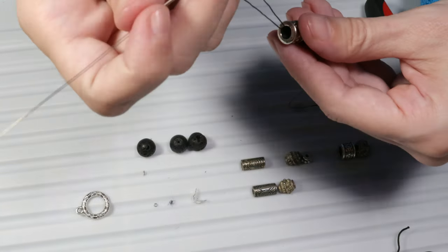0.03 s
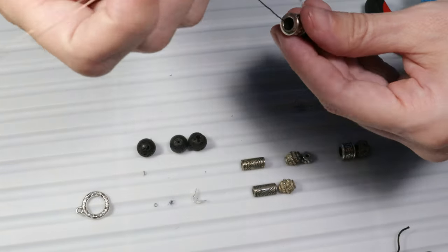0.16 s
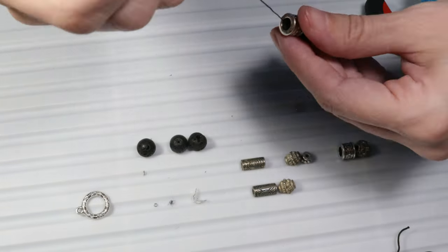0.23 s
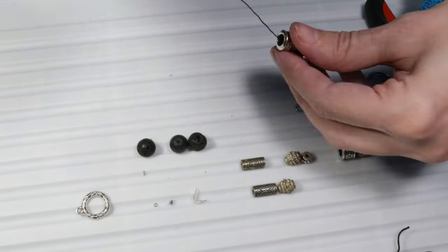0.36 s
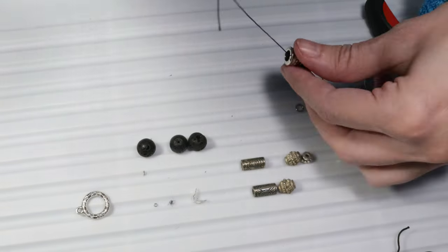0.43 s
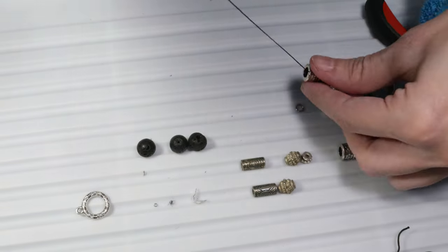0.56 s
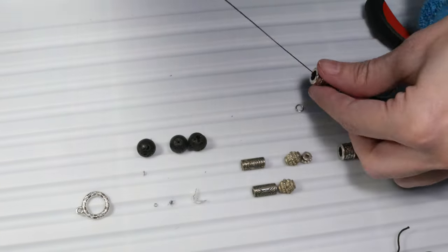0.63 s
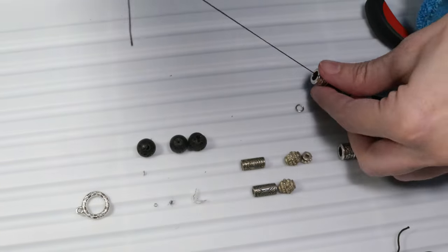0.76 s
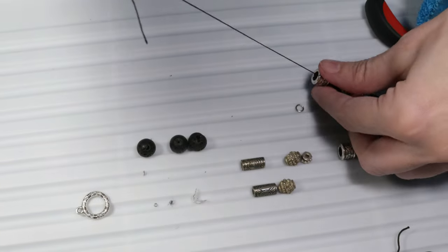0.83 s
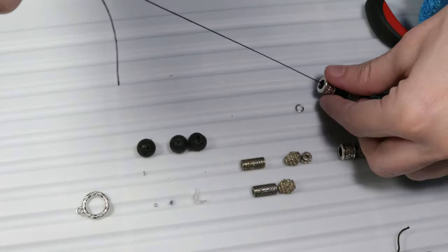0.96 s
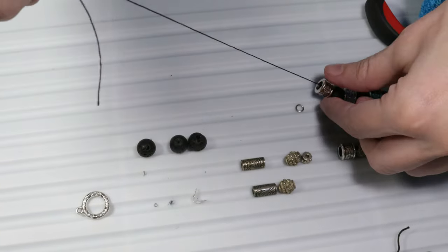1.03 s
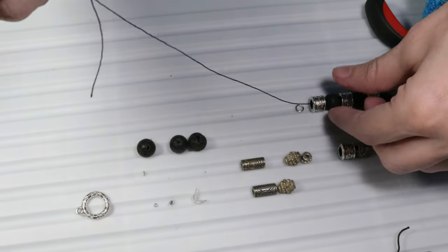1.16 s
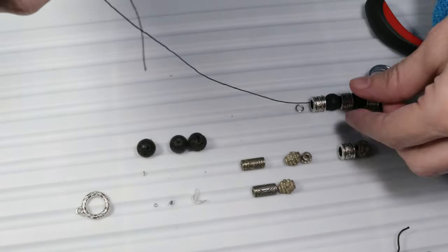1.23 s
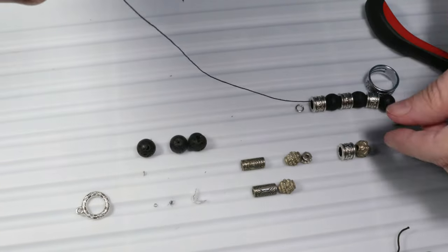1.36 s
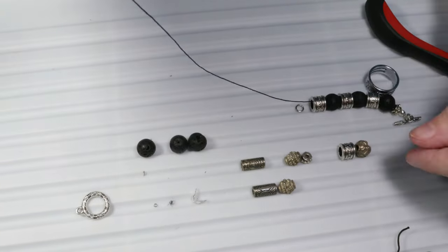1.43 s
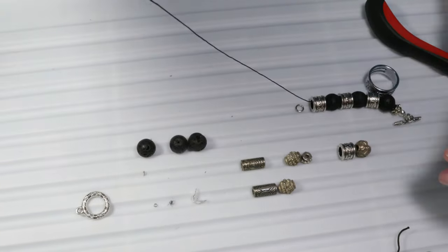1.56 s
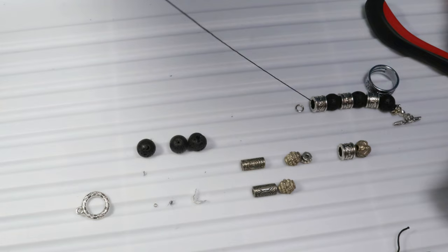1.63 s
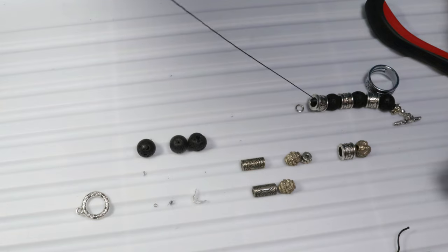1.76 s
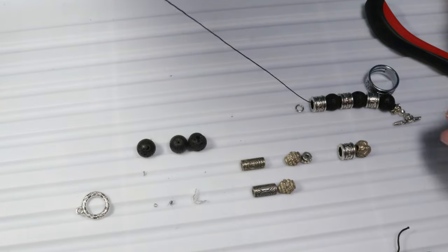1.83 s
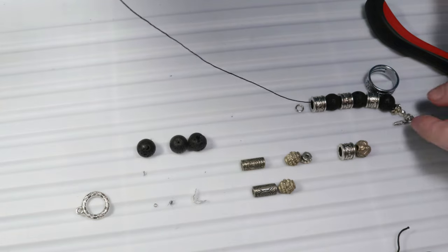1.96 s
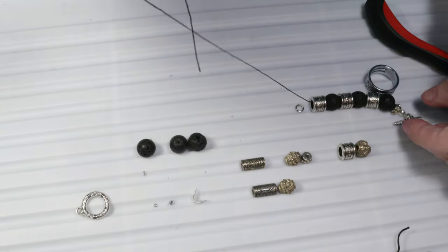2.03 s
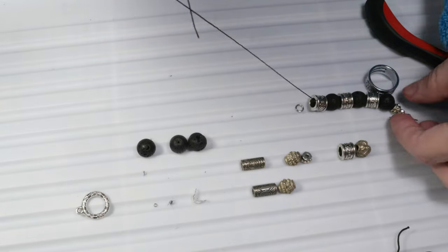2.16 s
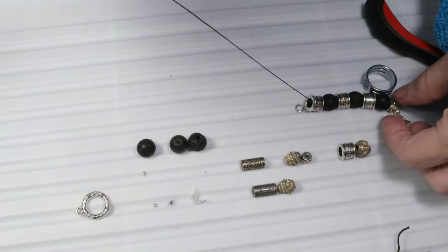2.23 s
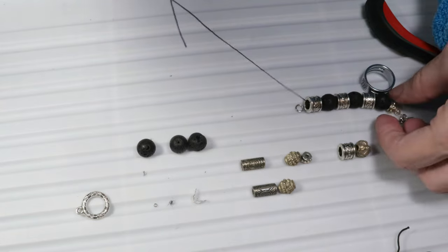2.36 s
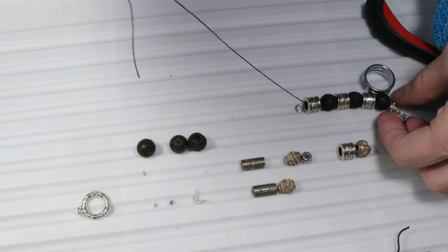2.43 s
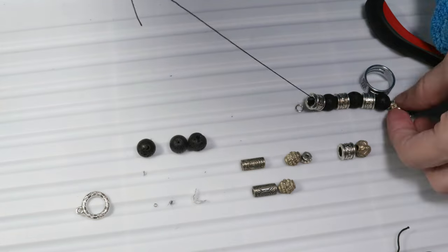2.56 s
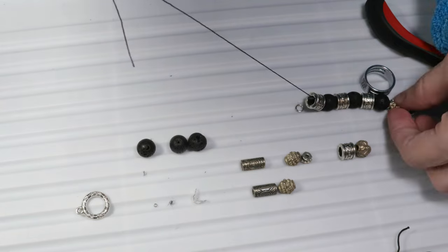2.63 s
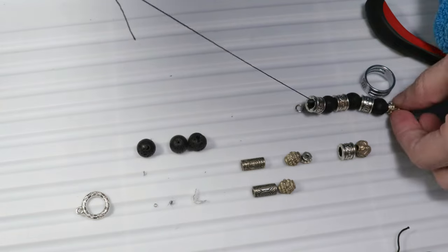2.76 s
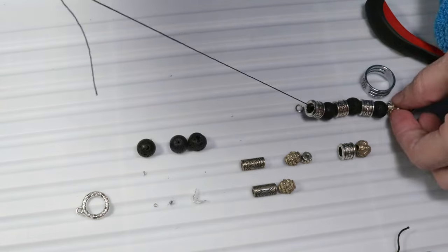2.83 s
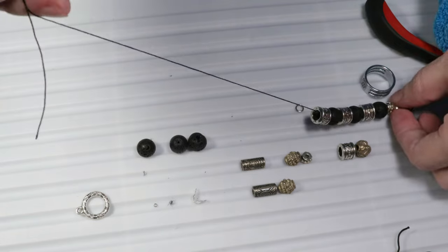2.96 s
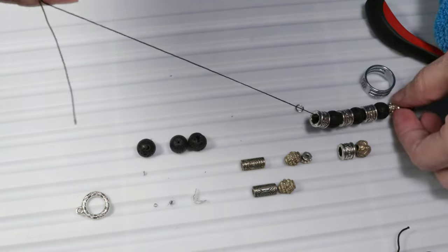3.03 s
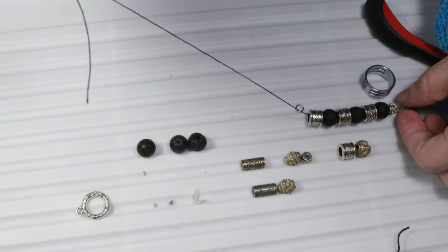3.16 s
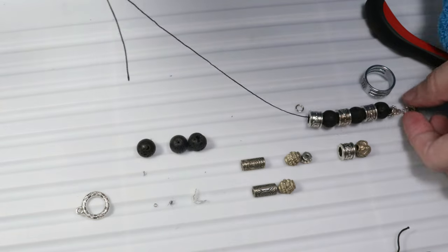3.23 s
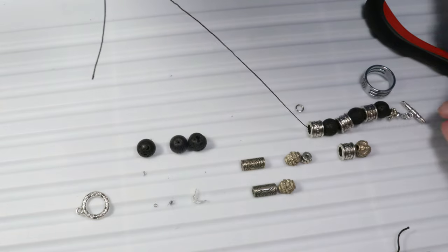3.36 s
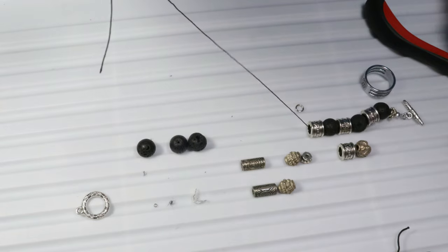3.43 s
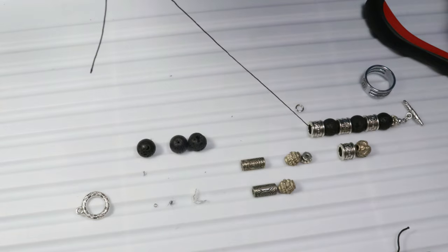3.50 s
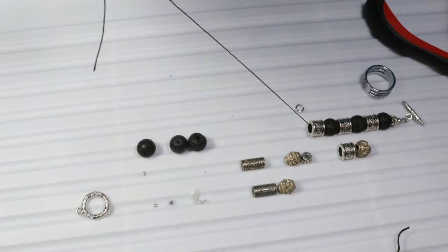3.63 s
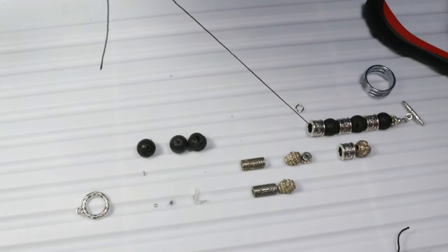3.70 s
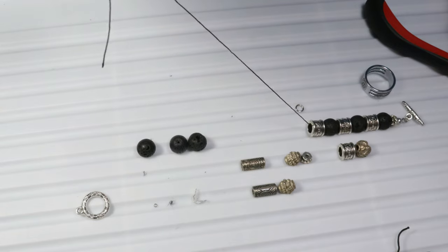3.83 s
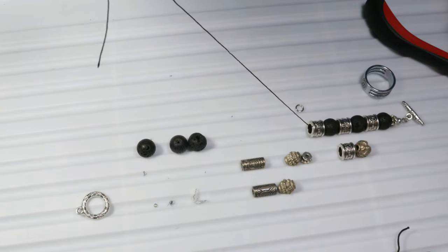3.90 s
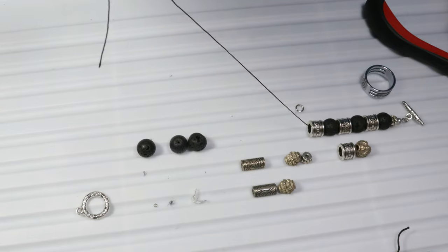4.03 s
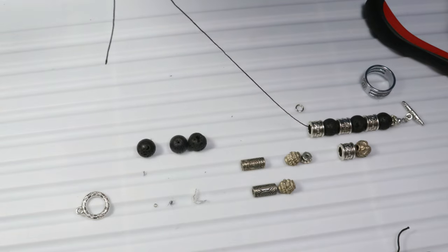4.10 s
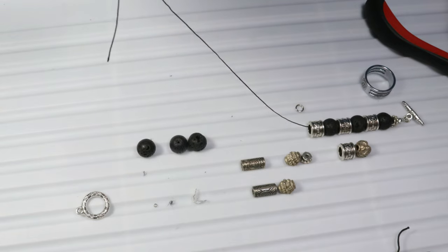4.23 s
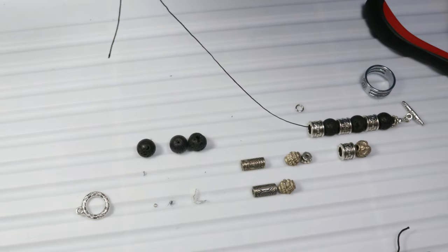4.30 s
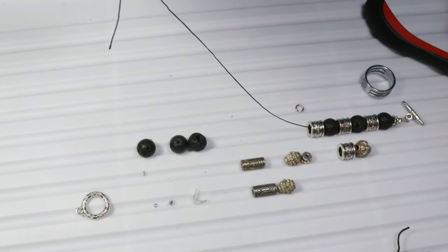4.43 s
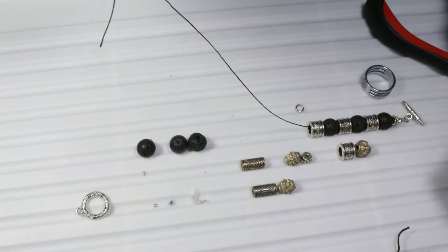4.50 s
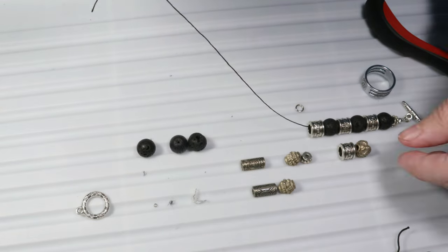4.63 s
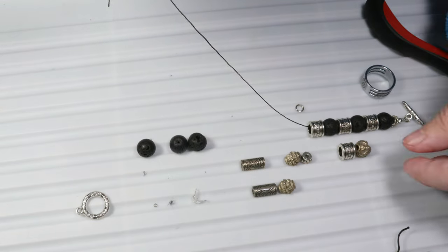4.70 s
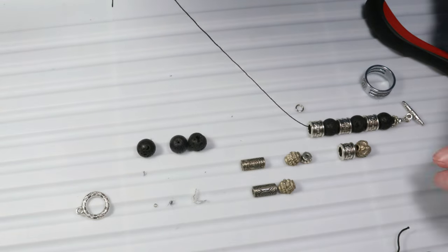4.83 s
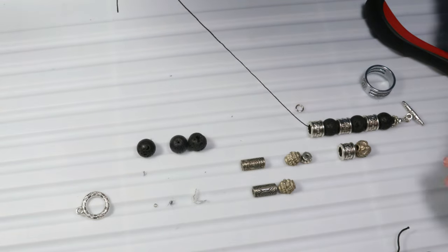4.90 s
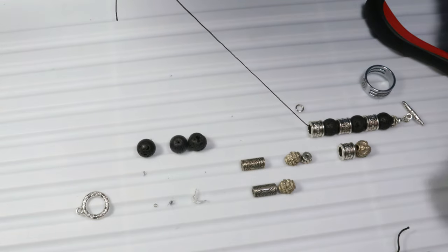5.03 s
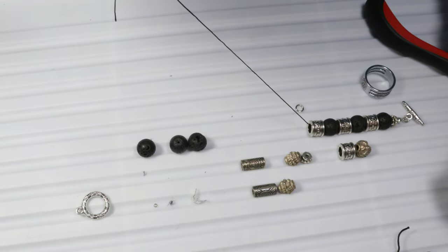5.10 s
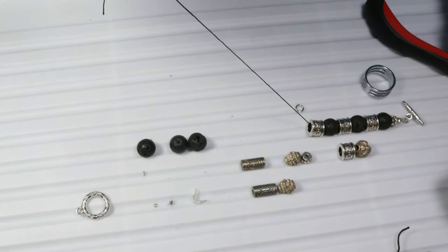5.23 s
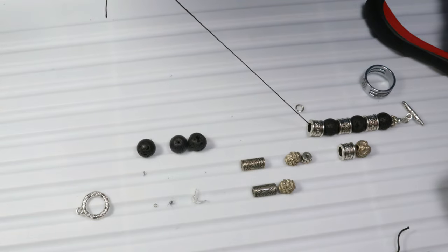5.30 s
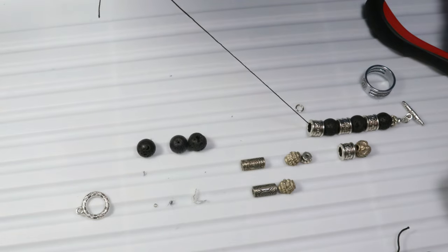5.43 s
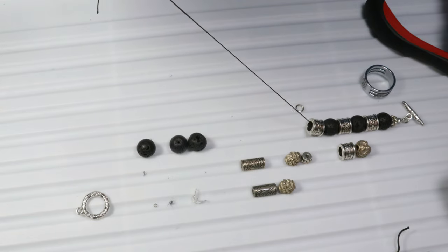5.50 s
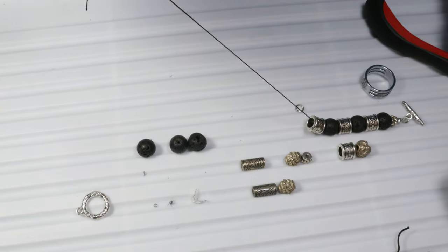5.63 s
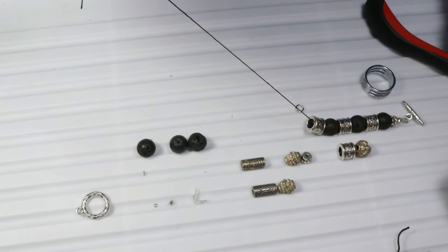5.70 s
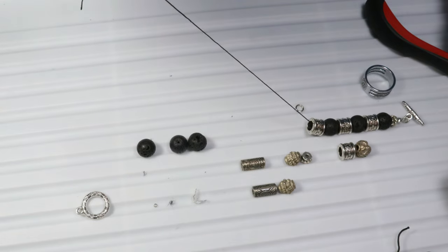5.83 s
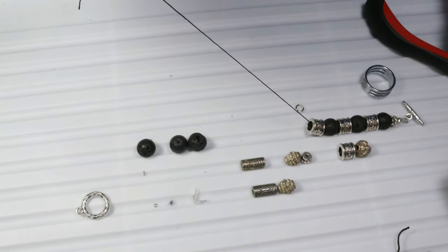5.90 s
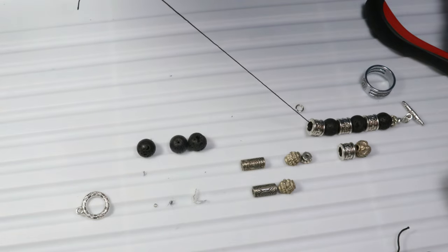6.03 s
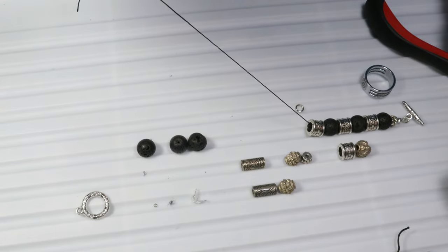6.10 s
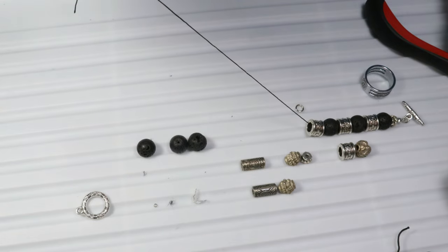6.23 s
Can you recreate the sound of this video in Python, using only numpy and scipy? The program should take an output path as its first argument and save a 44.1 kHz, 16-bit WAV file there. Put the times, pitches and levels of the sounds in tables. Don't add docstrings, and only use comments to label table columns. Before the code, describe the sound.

After a quiet start, small hard beads tick and rub against a thin, resonant table, building to a dense rattle as the strand is laid down. A few stray taps, then dull fingertip bumps, short drags and clicks. A pause of faint touches leads to another crisp clatter when the strand is let go. The ending is almost empty, with soft fan and air noise. Close and dry.

```python
import sys
import numpy as np
from scipy import signal
from scipy.fft import rfft, irfft, next_fast_len
from scipy.io import wavfile
from scipy.ndimage import uniform_filter1d

SR = 44100
rng = np.random.default_rng(int(sys.argv[2]) if len(sys.argv) > 2 else 0)


def decibels_to_gain(level_db):
    exponent = np.asarray(level_db, float) / 20
    return 10 ** exponent


def store_pcm(level_fs):
    pcm = np.round(np.clip(level_fs, -1, 1) * 32767).astype(np.int16)
    wavfile.write(sys.argv[1], SR, np.atleast_2d(pcm).T)


N = 276088


def unit(x):
    return x / np.sqrt(np.mean(x ** 2))


def shaped(spectrum):
    hz, db = np.transpose(spectrum)
    size = next_fast_len(N, True)
    f = np.arange(size // 2 + 1) * SR / size + 1
    gain = decibels_to_gain(np.interp(np.log(f), np.log(hz), db))
    noise = rfft(rng.standard_normal(N), size)
    return unit(irfft(noise * gain, size)[:N])


# (frequency [Hz], density [dB/Hz])
HUM_MID = [(12, -42), (20, -13.5), (44, -6), (196, -5), (225, -3), (289, -4.5), (333, -3), (404, -7.5),
           (439, 0.5), (505, -7.5), (597, -9.5), (1100, -13), (1580, -20.5), (2100, -20), (9930, -41),
           (13500, -48.5), (15500, -68)]
# (frequency [Hz], density [dB/Hz])
HUM_SIDE = [(12, -52), (20, -38), (66, -10.5), (225, -1), (259, -1.5), (352, -1.5), (491, -2), (581, -2.5),
            (1200, -6), (1580, -7), (4680, -16.5), (10800, -29), (15500, -41)]
# (frequency [Hz], rms [dB])
FAN_TONES = [(226.1, -59), (387.6, -64.5), (452.2, -62)]
HUM_MID_DB, HUM_SIDE_DB = -48.5, -49.5


def hum():
    swell = decibels_to_gain(0.36 * unit(uniform_filter1d(rng.standard_normal(N), 6000)))
    mid = decibels_to_gain(HUM_MID_DB) * shaped(HUM_MID) * swell
    for hz, db in FAN_TONES:
        line = [(hz - 9, -60), (hz - 2.5, 0), (hz + 6.3, 0), (hz + 9, -60)]
        mid = mid + decibels_to_gain(db - 0.5) * shaped(line)
    side = decibels_to_gain(HUM_SIDE_DB) * shaped(HUM_SIDE)
    return np.array([mid + side, mid - side])


# (centre [Hz], level [dB], t60 [s])
ROOM = [(268, -6, 0.38), (1050, -22.5, 0.32), (2140, -5.5, 0.17), (4440, -5.5, 0.15), (9100, -12.5, 0.025)]
# (centre [Hz], width [Hz], share lost [0-1])
ROOM_DIPS = [(1940, 180, 0.39), (620, 140, 0.29), (2740, 180, 0.56), (4130, 300, 0.46)]


def room(x):
    t = np.arange(int(0.4 * SR)) / SR
    tail = np.zeros((2, len(t)))
    for hz, db, t60 in ROOM:
        sos = signal.butter(2, [hz / 2.04, min(hz * 1.51, 16000)], "band", fs=SR, output="sos")
        decay = decibels_to_gain(-60 * t / t60) * (1 - np.exp(-t / 0.0039))
        noise = signal.sosfilt(sos, rng.standard_normal(tail.shape))
        tail += decibels_to_gain(db) * noise * decay / np.sqrt(np.sum(decay ** 2))
    for hz, width_hz, share in ROOM_DIPS:
        tail = tail - share * signal.lfilter(*signal.iirpeak(hz, hz / width_hz, fs=SR), tail)
    both = tail.mean(0)
    tail = both + 0.23 * (tail - both)
    return signal.fftconvolve(x[None], tail, axes=1)[:, :N]


# (time [s], peak [dB], pitch [Hz], t60 [s])
PRESS = [(0.79, -29.5, 303.5, 0.15), (0.957, -26.5, 226, 0.045), (1.015, -29, 208, 0.13),
         (1.183, -34, 304, 0.05), (1.251, -26.5, 300, 0.147), (2.191, -16, 216, 0.03),
         (2.557, -21, 278, 0.057), (2.66, -32, 186, 0.092), (3.108, -36.5, 190, 0.12),
         (3.225, -37, 221, 0.044), (3.448, -39.5, 223.4, 0.68), (3.626, -35, 300, 0.083),
         (3.633, -26, 186, 0.091), (1.256, -35, 119, 0.11), (3.452, -28, 105, 0.12)]


def press():
    out = np.zeros(N)
    t = np.arange(int(0.3 * SR)) / SR
    for s, db, hz, t60 in PRESS:
        bend = np.sin(2 * np.pi * hz * t) + 0.34 * np.sin(2 * np.pi * 1.7 * hz * t)
        start = int(s * SR)
        out[start:start + len(t)] += decibels_to_gain(db - 60 * t / t60) * (1 - np.exp(-t / 0.0062)) * bend
    return out


# (time [s], peak [dB], pitch [Hz], t60 [s])
CHIME = [
    (.955, -56, 6610, 0.067),
    (1.025, -45, 6600, 0.05),
    (1.035, -49, 6600, .05),
    (1.225, -41, 6560, 0.033),
]


def chime():
    out = np.zeros(N)
    t = np.arange(int(0.2 * SR)) / SR
    for s, db, hz, t60 in CHIME:
        envelope = decibels_to_gain(db) * (1 - np.exp(-t / 0.0027)) * decibels_to_gain(-60 * t / t60)
        start = int(s * SR)
        out[start:start + len(t)] += envelope * np.sin(2 * np.pi * hz * t)
    return out


MUFFLED_SHARE, MUFFLED_T60_RATIO = 0.53, 0.33


def two_poles(hz, t60_s):
    return [1, -2 * decibels_to_gain(-60 / (t60_s * SR)) * np.cos(2 * np.pi * hz / SR), decibels_to_gain(-120 / (t60_s * SR))]


def ring(blows, hz, t60_s, muffle=0):
    slow = two_poles(hz, max(t60_s, 0.001))
    quick = two_poles(hz, max(t60_s * MUFFLED_T60_RATIO, 0.001))
    mix = (1 - muffle) * np.array(quick) + muffle * np.array(slow)
    return signal.lfilter(np.sin(2 * np.pi * hz / SR) * mix, np.convolve(slow, quick), blows)


SCATTER_DB = 2.5
FAVOUR, FAVOUR_WIDTH = 2.7, 0.066


def strike(modes, at, size, favour_hz=None):
    hz, db, t60 = np.transpose(modes)
    chance = rng.standard_normal((len(at), 2, len(modes)))
    share = decibels_to_gain(db + SCATTER_DB * chance[:, 0]) * np.sign(chance[:, 1] + 1)
    muffle = 0
    if favour_hz is not None:
        distance = (hz / favour_hz[:, None] - 1) / FAVOUR_WIDTH
        share = share * (1 + FAVOUR * np.exp(-distance ** 2))
        muffle = MUFFLED_SHARE
    share = share * (size / np.sqrt(np.sum(share ** 2, axis=1)))[:, None]
    late_s = np.minimum(np.abs(chance[:, 1]), 2) * 0.0005 * np.minimum(hz / 5000, 1) ** 2
    late = (late_s * SR).astype(int)
    out = np.zeros(N)
    for k in range(len(modes)):
        blows = np.bincount(at + late[:, k], share[:, k], N)[:N]
        out += ring(blows, hz[k], t60[k], muffle)
    out = signal.lfilter(*signal.butter(4, min(hz.max() * 1.81, 16000), fs=SR), out)
    return signal.lfilter(*signal.butter(2, hz.min() / 2.2, "high", fs=SR), out)


GRIT_SPREAD_DB = 4.5


def swarm(modes, count, spread_db):
    at = rng.integers(0, N, count)
    force = np.minimum(rng.exponential(size=count), 3)
    return unit(strike(modes, at, decibels_to_gain(spread_db * force)))


def strokes(rows, column, attack_s, release_s):
    t, power = np.arange(N) / SR, np.zeros(N)
    for row in rows:
        start_s, length_s = row[0], row[1]
        a, b = int(start_s * SR), int((start_s + length_s + 8 * release_s) * SR)
        age = t[a:b] - start_s
        shape = np.clip(age / attack_s, 0, 1) * np.exp(-np.maximum(age - length_s, 0) / release_s)
        power[a:b] += (decibels_to_gain(row[column]) * shape) ** 2
    return np.sqrt(power)


# (time [s], length [s], level [dB])
RASP = [
    (.5731, .002, -33),
    (.5771, .02, -58),
    (.7851, .004, -34),
    (.7901, .025, -56),
    (.7991, .005, -32),
]
RASP_DB, RASP_ATTACK_S, RASP_RELEASE_S = 1, 0.0036, 0.00041


def thread():
    bore = [(6900, 1, 0.0023), (8300, -14, 0.0026), (9600, 12.0, 0.0017),
            (10600, 7.0, 0.0071), (11400, 5, 0.0035)]
    gain = decibels_to_gain(RASP_DB) * strokes(RASP, 2, RASP_ATTACK_S, RASP_RELEASE_S)
    return [swarm(bore, count=30000, spread_db=GRIT_SPREAD_DB) * gain for _ in range(2)]


# (time [s], length [s], rattle [dB], weight [dB], grit [dB])
DRAG = [(.578, 0.024, -51, -58, -80), (.58, 0.18, -55.5, -47.5, -75), (.75, 0.07, -50, -41.5, -79),
        (.9, 0.15, -56, -49, -83), (1.015, 0.1, -45, -37.5, -70), (1.15, .19, -47.5, -53, -79),
        (2.275, 0.059, -48.5, -60, -80), (2.228, 0.11, -48.5, -42, -73), (2.35, 0.065, -49, -41.5, -80),
        (2.46, 0.038, -65, -46.5, -86), (2.56, 0.051, -47, -39.5, -60), (2.66, 0.12, -57.5, -49, -86),
        (2.86, 0.14, -63, -58, -80), (2.985, 0.033, -49, -42, -66), (3.11, 0.11, -62, -50, -79),
        (3.28, 0.031, -57, -54, -76), (3.385, 0.0093, -50.5, -48, -62), (1.822, .01, -55, -55, -76),
        (3.208, .015, -57, -49, -80), (4.33, .008, -62, -58, -67), (4.19, 0.0091, -57, -60, -80)]
# (frequency [Hz], level [dB], t60 [s])
LOW = [(186, 0, 0.35), (226, 0, 0.1), (300.6, 0, 0.21)]
DRAG_ATTACK_S, DRAG_RELEASE_S = 0.0045, 0.035


def drag():
    upper = np.vstack([RING, np.array(EDGE) + [0, 0.5, 0]])
    rattle = swarm(upper, count=6000, spread_db=1.5)
    rattle = unit(rattle + decibels_to_gain(0.5) * swarm(BODY, count=10000, spread_db=-2.0))
    weight = swarm(THUD, count=9000, spread_db=3.0)
    weight = unit(weight + decibels_to_gain(-3.5) * swarm(LOW, count=4000, spread_db=-1.5))
    grit, across = (swarm(TICK, count=8000, spread_db=GRIT_SPREAD_DB) for _ in range(2))
    rattle_gain, weight_gain, grit_gain = (strokes(DRAG, k, DRAG_ATTACK_S, DRAG_RELEASE_S) for k in (2, 3, 4))
    return rattle * rattle_gain + weight * weight_gain + grit * grit_gain, across * grit_gain


# (time
# [s], ring peak [dB], thud, body, tick [dB re ring])
KNOCKS = [(0.5743, -21.5, -12, -10, -21), (0.6024, -40, -6, -20, -28), (0.716, -34, -11, -18, -30),
          (0.7866, -24, -21, -13, -16), (0.7934, -27.5, -8, -5.5, -15.5), (0.8005, -31.5, -2, -12, -26),
          (0.9457, -36, -3, -17, -13), (1.0723, -30.5, -1, -2, -21), (1.111, -27, -9, -3, -9),
          (1.1429, -26, -4, -12, -28), (1.1863, -11.5, -4, -4.5, -20), (1.2004, -14.5, -5.5, -2.5, -16),
          (1.2103, -26, -5, -9, -25), (1.254, -11, -25, -7, -30), (1.257, -9, -5.5, -8, -19.5),
          (1.267, -17, -13, -4, -36), (1.2711, -7.5, -5, -3, -19.5), (1.2746, -9, -15.5, -4, -22),
          (1.2855, -20, -15, -7, -25), (1.2912, -22, -9, -6, -19), (1.3073, -26, -13, -23, -23),
          (2.2341, -29, -29, -12, -19), (2.2413, -25.5, -20, -12, -18),
                 (2.2795, -29.5, -5.5, -2, -22), (2.284, -38, -4, -10, -12), (2.2918, -29.5, -19, -4, -29),
                 (2.2971, -32, -12, -2, -20), (2.318, -33.5, 6, 2, -22), (2.3796, -24, -10, -14, -16.5),
                 (2.401, -36.5, 6.5, -4, -29), (2.463, -19.5, -8.5, -4, -29),
                 (2.4985, -16, -25, -3.5, -28.5), (2.5294, -43, 1, -11, -16), (2.5658, -37, -8, -20, -0.5),
                 (2.5765, -33, -21, -16, -6), (2.5821, -26, -25, -5, -7.5), (2.5915, -36, -7, -13, -15),
                 (2.6117, -31, -16, -3, -13), (2.626, -28.5, -21, -1.5, -10),
                 (2.6612, -30.5, -3.5, -4.5, -30),
          (3.227, -19, -9.5, 0, -24), (3.2304, -15.5, -14, -2, -19.5), (3.2421, -32, 0, -7, -30),
            (3.2508, -17.5, -8, -5, -16), (3.2572, -22.5, -14, 3.5, -23), (3.2616, -27.5, -2, 1, -28),
            (3.2792, -15, -16, -4.5, -25), (3.4505, -9, -9, -6, -17), (3.4618, -12, -13, -11.5, -18.5),
            (3.4761, -17, -13, -13, -30), (3.4826, -22, -8, -5, -14), (3.5, -14, -9, -2, -27),
            (3.5166, -26, -8, -1, -15), (3.5542, -16.5, -16, -9, -33), (3.5709, -12.5, -11.5, -8, -21.5),
            (3.5782, -18.5, -8, -20, -31), (3.582, -28, 0, 3, -27), (3.591, -29, -1, -1, -16),
            (3.6244, -14, -11, -11, -28), (3.63, -8.5, -1.5, -2.5, -13.5), (3.64, -14.5, -11, -4, -18),
            (3.6536, -20.5, -10, -21, -16.5), (3.6602, -24.5, -10, -20, -17),
          (1.7309, -35.5, -11, -7, -17), (1.832, -26.5, -8, -8.5, -45), (1.909, -26.5, -8, -8, -44),
         (1.93, -22, -11, -3, -30), (1.9539, -17.5, -13.5, -6, -31), (1.9642, -14, -15.5, -6.5, -23.5),
         (1.972, -25, -10, -13, -37), (1.9818, -32, -9, -6, -24), (2.8576, -40, 0, -2, -22),
         (2.9176, -24, -9, -13.5, -47), (2.9714, -32.5, -11, -5.5, -40), (2.9979, -34, -5, -20, -23),
         (3.014, -32, -14, -13, -29), (3.0276, -32, -8, -22, -24), (3.057, -29, -11, -18, -28),
         (3.1107, -30.5, -4.5, -6, -44), (3.1358, -36.5, -4, -13, -18), (4.0124, -42, 4.5, -9, -20),
         (4.1058, -24, -11.5, -6.5, -28), (4.1846, -28.5, -7.5, -9, -23), (4.3329, -44, -1, -3, -4),
         (5.1787, -43, -5, -14, -17), (5.4418, -42.5, 0, 2, -29),
          (1.7414, -37.5, -5, -13, -34), (1.9345, -33, -1, 6, -32), (5.68, -50, 8, -2, -25),
            (5.91, -52.5, 11.5, 5, -25), (0.663, -40, -11, -16, -30), (1.0227, -44, 4, 3, -22),
            (1.0869, -39.5, 1, 8, -26), (1.12, -33.5, -0.5, 5, -16), (1.1701, -30.5, -1, 3, -10),
            (1.2252, -36, -6, 8, -17), (1.3237, -49, -7, -5, -35), (2.194, -42, 5, -6, -13),
            (2.2155, -37, -12, -6, -28), (2.2552, -37, -8, 3, -29), (2.303, -30.5, -9, 0, -15.5),
            (2.327, -36, 1, -4, -25), (2.7722, -35.5, -1.5, -2.5, -26), (2.801, -41.5, 0, 2, -24),
            (3.037, -42, -9, -7, -28), (3.4139, -36, -9, -9, -20), (4.193, -39, -13, -6, -19),
            (5.2114, -50, 4, -3, -8), (5.2376, -49, 1, 9, -23),
          (.6338, -50, -9, -8, -20), (.7625, -44, 2, -12, -16), (0.8036, -42, 0, -10, -8),
           (.8135, -33, -5, -4, -24), (0.82, -40, 9, 1, -25), (.8295, -50, 0, -2, -25),
           (0.8793, -42, 7.5, -2, -22), (1.0194, -40, 7, -15, -21), (1.102, -44, 7, 0, -20),
           (1.125, -38, 9.5, 10, -20), (2.23, -41, -16, -8, -16), (2.3093, -33, -2, 2, -19),
           (2.341, -41, -1, -1, -11), (2.349, -41, -10, -2, -22), (2.5624, -36.5, 4, -14, -11),
           (2.594, -47, 7, -12, -20), (2.643, -40, -12, -6, -11), (3.0408, -44, -4, -10, -6),
           (3.0547, -36, -7, -14, -22), (3.256, -35, -5, -6, -25), (3.2686, -30, -8, 2, -27),
           (3.284, -28, -4.5, -2, -28), (3.4538, -11, -9, -5.5, -24), (3.4653, -23, -0.5, 4, -30)]
# (time [s], ring [Hz], body [Hz], thud [Hz])
PLACE = [(0.574, 2060, 1320, 780), (0.786, 2120, 1410, 514), (0.8, 2130, 1380, 465),
         (1.073, 1940, 1100, 640), (1.111, 2020, 1050, 624), (1.142, 2075, 1080, 493),
         (1.169, 1820, 1270, 730), (1.186, 1810, 1020, 584), (1.2, 1840, 1054, 620),
         (1.254, 1830, 1340, 570), (1.271, 1880, 1060, 556), (1.287, 1880, 1080, 620),
         (1.731, 2120, 1020, 597), (1.831, 2280, 1050, 467), (1.909, 1800, 960, 670),
         (1.93, 1790, 1140, 620), (1.953, 1880, 1035, 620), (1.964, 1880, 1250, 745),
         (1.972, 1870, 1050, 510), (2.235, 2220, 1290, 616), (2.28, 2120, 1090, 640),
         (2.301, 1840, 1080, 740), (2.379, 2070, 1290, 660), (2.464, 1970, 1040, 700),
         (2.498, 1800, 1030, 620), (2.582, 2350, 1020, 555), (2.611, 2380, 1050, 640),
         (2.627, 2290, 1010, 680), (2.661, 2130, 1310, 560), (2.917, 2000, 1080, 660),
         (2.97, 2030, 1040, 680), (2.998, 2060, 1030, 504), (3.057, 2040, 1040, 517),
         (3.11, 1950, 1310, 700), (3.227, 1970, 1130, 776), (3.251, 2090, 1080, 766),
         (3.279, 1850, 1050, 760), (3.414, 2050, 930, 470), (3.45, 1970, 1270, 602),
         (3.462, 1900, 1050, 610), (3.476, 1850, 1040, 630), (3.5, 2150, 1150, 616),
         (3.554, 1870, 1080, 706), (3.571, 2140, 1180, 603), (3.624, 2030, 1170, 670),
         (3.63, 2000, 1460, 567), (3.64, 1930, 1180, 660), (3.655, 2100, 1230, 640),
         (4.105, 1890, 1050, 696), (4.184, 1940, 1220, 680)]
# (frequency [Hz], level [dB], t60 [s])
THUD = [(306, -4.5, 0.026), (402, -14, 0.0087), (508, 2, 0.027), (569, 1.5, 0.046), (614, 5.5, 0.071),
        (660, 4.5, 0.034), (698, 6.5, 0.054), (813, -2.5, 0.009)]
# (frequency [Hz], level [dB], t60 [s])
BODY = [(1017, -14, 0.06), (1102, 4.5, 0.043), (1153, -0.5, 0.026), (1220, -3, 0.028), (1310, 8.5, 0.042),
        (1380, 3.5, 0.03), (1460, -1.5, 0.019)]
# (frequency [Hz], level [dB], t60 [s])
RING = [(1790, -13, 0.016), (1812, 0, 0.025), (1880, 9.5, 0.022), (1970, 1, 0.049), (2034, 8, 0.02),
        (2140, 5, 0.017), (2200, -18, 0.008), (2410, 2.5, 0.032), (2520, 7, 0.02), (2637, 9, 0.015)]
# (frequency [Hz], level [dB], t60 [s])
EDGE = [(2980, -11, 0.019), (3143, -2, 0.031), (3315, 7, 0.0051), (3720, 4.5, 0.0052), (4166, 3, 0.0094),
        (4430, -10, 0.0079)]
# (frequency [Hz], level [dB], t60 [s])
TICK = [(4920, 11, 0.0018), (6110, 2, 0.004), (6890, -1, 0.0055), (8100, 2, 0.0026), (9200, 3, 0.0025),
        (10650, -1.5, 0.0039), (11500, -25, 0.003)]
# (frequency [Hz], level [dB], t60 [s])
AIR = [(12800, -8, 0.0022), (13800, -4, .0025), (14800, -3, .002)]
AIR_DB, LEAD_S = -31, 0.0001
ROCK_S, ROCK_SPREAD_S, ROCK_DB = 0.002218, 0.0005, -7.5


def knocks():
    rows = np.array(KNOCKS)
    rocked = rows + [ROCK_S, ROCK_DB, -5, 0, -6]
    rocked[:, 0] += ROCK_SPREAD_S * rng.standard_normal(len(rows))
    s, db, thud_db, body_db, tick_db = np.concatenate([rows, rocked]).T
    place = np.array(PLACE)
    current = np.maximum(np.searchsorted(place[:, 0] - 0.003, s) - 1, 0)
    _, ring_hz, body_hz, thud_hz = place[current].T
    at = ((s - LEAD_S) * SR).astype(int)
    table = strike(RING, at, decibels_to_gain(db - 1.37), ring_hz)
    table = table + strike(BODY, at, decibels_to_gain(db + body_db - 0.1), body_hz)
    table = table + strike(THUD, at, decibels_to_gain(db + thud_db + 1.2), thud_hz)
    table = table + strike(EDGE, at, decibels_to_gain(db + 0.72 * tick_db + 3.5))
    tick = decibels_to_gain(db + tick_db + 9.0)
    table = table + strike(AIR, at, tick * decibels_to_gain(AIR_DB))
    return table + strike(TICK, at, tick), strike(TICK, at, tick)


PORT_LAG_S, TREBLE_SIDE_DB = 3e-5, -7
MIC_LOW_HZ, MIC_TOP_HZ, SIDE_TOP_HZ = 126, 14400, 13100


def mic_band(x, top_hz):
    return signal.sosfilt(signal.butter(4, [MIC_LOW_HZ, top_hz], "band", fs=SR, output="sos"), x)


def scene():
    shared, across = np.sum([knocks(), drag(), thread()], axis=0)
    shared = shared + press() + chime()
    across = across * decibels_to_gain(TREBLE_SIDE_DB)
    size = next_fast_len(N, True)
    f = np.arange(size // 2 + 1) * SR / size
    late = irfft(rfft(shared, size) * np.exp(-2j * np.pi * f * PORT_LAG_S), size)[:N]
    left, right = np.array([late + across, shared - across]) + room(shared)
    mid = mic_band((left + right) / 2, MIC_TOP_HZ)
    side = mic_band((left - right) / 2, SIDE_TOP_HZ)
    return np.array([mid + side, mid - side]) + hum()


def roll_off(x):
    return signal.sosfilt(signal.butter(12, 15700, fs=SR, output="sos"), x)


CONVERTER_TOP_HZ = 15600


def record(dry):
    mix = signal.sosfilt(signal.ellip(8, 0.2, 50, CONVERTER_TOP_HZ, fs=SR, output="sos"), dry)
    return roll_off(mix)


dry = scene()
out = record(dry)
store_pcm(out)
```